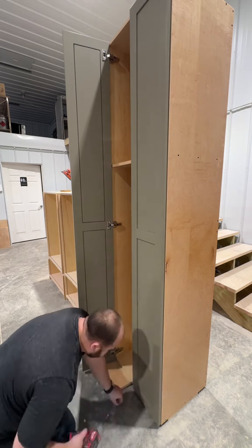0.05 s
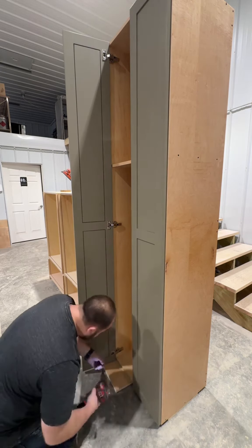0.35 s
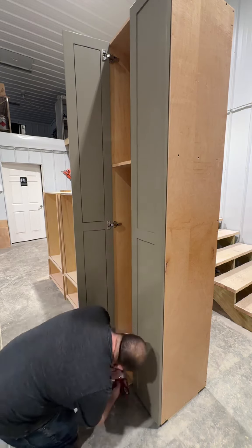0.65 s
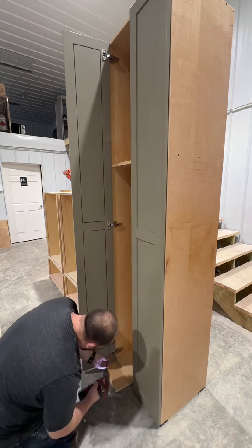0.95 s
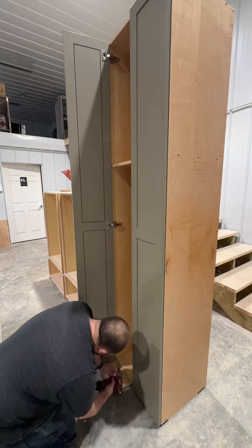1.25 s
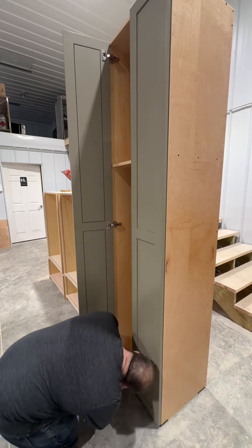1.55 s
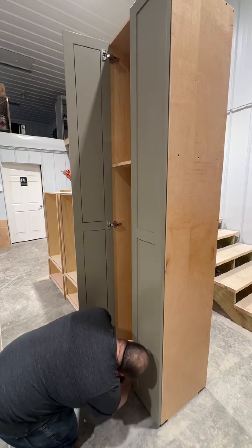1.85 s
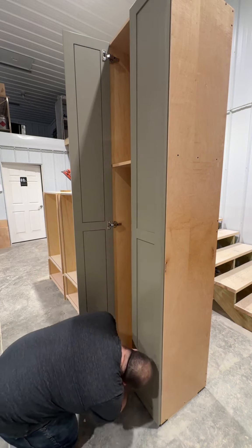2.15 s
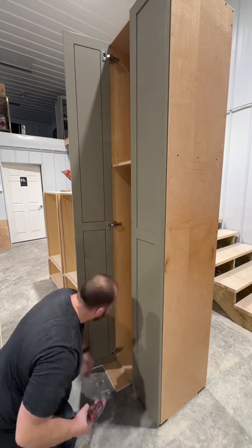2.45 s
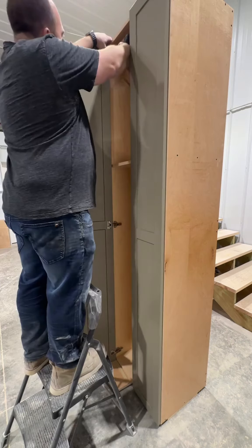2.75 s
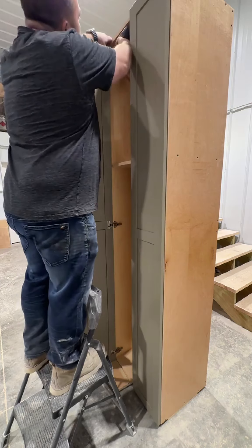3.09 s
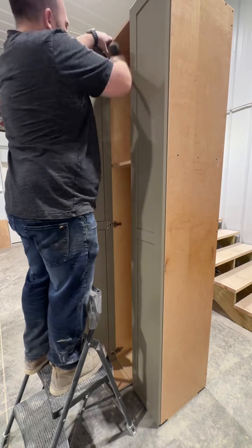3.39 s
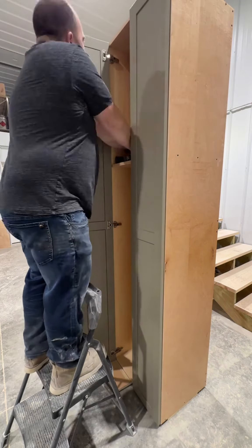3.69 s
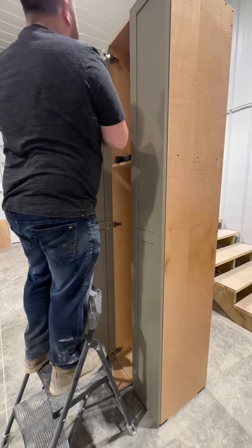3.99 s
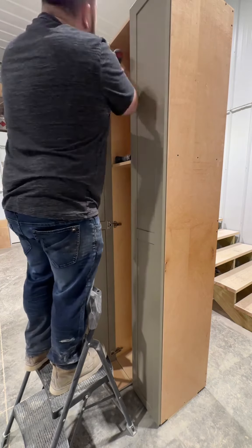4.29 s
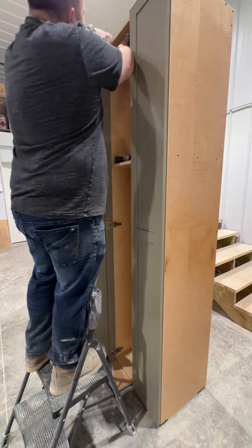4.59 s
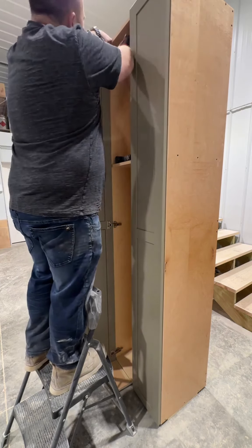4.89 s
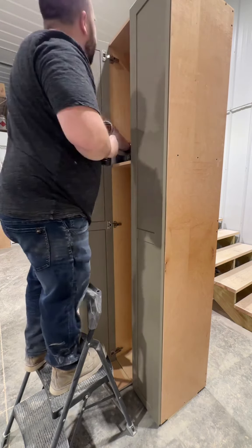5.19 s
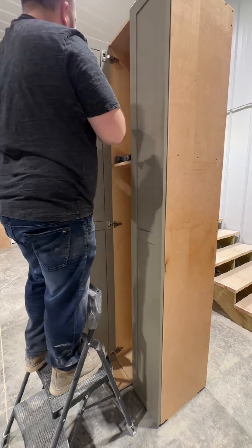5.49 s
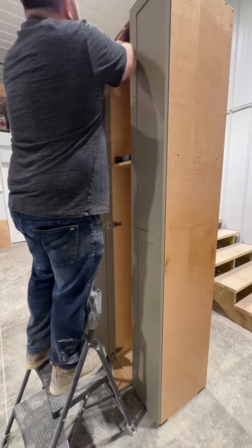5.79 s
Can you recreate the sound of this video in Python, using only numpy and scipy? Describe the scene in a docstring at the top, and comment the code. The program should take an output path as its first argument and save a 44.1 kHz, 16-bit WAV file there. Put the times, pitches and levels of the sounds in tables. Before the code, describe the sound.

Loud knocks and rattles on a wooden cabinet, with two short bursts of a cordless driver, in a quiet workshop.

```python
"""Fitting a cabinet door

In a quiet workshop, the door and body of a tall wooden cabinet knock and rattle as blows make the
panels ring. A cordless driver turns two hinge screws with hissing gears and is set down on a shelf.
Small steel parts tick, and a hinge sticks and slips in a squeak.
The room answers briefly over a faint ventilation hum."""
import sys
import numpy as np
from scipy import signal
from scipy.fft import rfft, irfft
from scipy.io import wavfile
from scipy.ndimage import uniform_filter1d

SR = 44100
rng = np.random.default_rng(int(sys.argv[2]) if len(sys.argv) > 2 else 0)


def bounce(signal):
    """Save signal as a 16-bit WAV file at the path given by the first command-line argument."""
    frames = np.transpose(np.atleast_2d(signal))
    limited = np.clip(frames, -1, 1)
    pcm = np.round(limited * 32767).astype(np.int16)
    wavfile.write(sys.argv[1], SR, pcm)


N = 261846
TIME = np.arange(N) / SR
HIT_SIZE = 16384  # samples in one knock or click
HIT_TIME = (np.arange(HIT_SIZE) - HIT_SIZE // 4) / SR  # the hit peaks at zero

# tone of the moving air: (frequency [Hz], relative level [dB])
AIR_TONE = [(15, -49.5), (25, -13), (118, -6), (176, -15.5), (243, 1), (278, -26), (354, -1), (394, -14.5),
            (462, -8), (558, -9.5), (790, -14.5), (856, -20), (978, -13), (1500, -31), (15000, -53)]
# notes at which the ducts, cabinet and shelf ring: (pitch [Hz], width [Hz], relative level [dB])
DUCT_MODES = [(75, 11, -8), (133.8, 13, 3), (249, 21, -3), (340, 42, -2), (435, 56, 2.5), (597.7, 16, -9)]
CABINET_MODES = [(94, 42, -10.5), (142.6, 22, 2), (211, 24, 2), (288.4, 20, 1.5), (364.4, 55, -8.5),
                 (432.7, 82, -7), (473, 13, -7), (603.7, 17, -4.5), (747, 23, -10.5), (899, 55, -3),
                 (970, 25, -14), (1202, 18, -12), (1393, 32, -34.5), (1565, 50, -22), (2090, 67, -21.5),
                 (2254, 13, -8.5), (2544, 260, -11), (2930, 81, -13.5), (3130, 24, -17), (3400, 62, -33.5)]
SHELF_MODES = [(124.7, 15, -14), (207, 23, -14), (289.3, 14, -4.5), (414, 45, -9.5), (470, 27.4, -0.5),
               (574, 56, -7.5), (683, 45, -3.5), (842, 14, -3.5), (1240, 89, -9), (1450, 64, -11),
               (1650, 37, -25), (2350, 86, -22), (2760, 110, -23)]
# the room's echo: (frequency [Hz], relative level [dB], fade time [s])
ROOM_BANDS = [(80, -16.5, 0.032), (180, -15, 0.082), (400, -8, 0.09), (900, -8.5, 0.095), (2360, -8, 0.093),
              (4740, -13.5, 0.063), (10030, -17.5, 0.013)]
# stereo width: (frequency [Hz], gain of the side signal [dB])
STEREO_WIDTH = [(40, -21), (130, -21), (330, -9), (700, -4.5), (1300, -3.5), (4000, -3.5), (12000, -3)]
# the hinge squeak: (start [s], end [s], pitch [Hz], level [dB])
SQUEAK = (1.828, 1.92, 1885, -67.5)
# screws and hinge parts touching: (time [s], strength [dB])
CLICKS = [(0.403, -88), (0.648, -81.5), (0.864, -85), (0.92, -80.5), (1.05, -87.5), (1.36, -90.5),
          (1.527, -91), (1.717, -78), (1.775, -84), (2.542, -73), (2.568, -69), (3.771, -80.5),
          (3.849, -77.5), (3.94, -83), (4.096, -76), (4.13, -74.5), (4.358, -82.5), (5.247, -68.5),
          (5.285, -72), (5.326, -70), (5.348, -73)]
# tone of the gears and of the shaken panel: (frequency [Hz], relative level [dB])
GEAR_TONE = [(500, -3.5), (900, 3.5), (1600, -5), (2400, 0), (2750, -2.5), (3080, 0.5), (3600, -6.5),
             (4500, -4), (5750, -1), (6050, 5), (6800, 0.5), (8000, -2), (10000, -6.5), (15500, -9)]
RUMBLE_TONE = [(30, -15), (60, -11.5), (85, -0.5), (135, -6.5), (400, -7), (550, -12), (800, -14),
               (1300, -51.5), (4000, -51)]
# pulls of the driver's trigger: (start [s], release [s], motor gain [dB], rumble gain [dB])
DRIVER_RUNS = [(2.774, 2.985, -44, -39.5), (3.26, 3.461, -42.5, -39.5)]
# blows on the cabinet: (time [s], strength [dB], extra bass [dB], dullness [dB], chatter time [s])
CABINET_KNOCKS = [(0.003, -28, -8.5, -6, 0.0082), (0.017, -25, -4.5, -3, 0.024),
                  (0.116, -38.5, -15.5, 22, 0.0092), (1.72, -59, 1, 17, .025), (1.84, -55, -3, -0.5, 0.028),
                  (1.885, -55, 0, 2, 0.038), (1.936, -31.5, 9.5, 3, 0.019), (1.951, -30.5, -17, 1, 0.0063),
                  (1.967, -36.5, 14, -0.5, 0.015), (1.992, -28, -15, 22, 0.0025),
                  (2.046, -33.5, 8.5, 7.5, 0.017), (2.072, -32.5, 10, 7.5, 0.008),
                  (2.118, -27.5, 0.5, -4, 0.017), (2.139, -22.5, -1, 4.5, 0.017),
                  (2.162, -30.5, 3.5, -4.5, 0.017), (2.249, -20, -1.5, 5, 0.022),
                  (2.342, -29, -2.5, -5, 0.01), (2.353, -24, -4, 0.5, 0.022), (2.597, -51.5, 2, 15, 0.012),
                  (2.627, -50.5, 10.5, 15.5, 0.013), (2.667, -56, 5, 17, .005),
                  (2.757, -54, 8.5, 19, 0.032), (3.072, -68.5, 13, 12, 0.022), (3.172, -48, 3.5, -1, 0.015),
                  (3.212, -45.5, -14, -1, 0.022), (3.263, -55.5, 15, 4.5, .008),
                  (4.465, -63, 9.5, 4, 0.012), (4.526, -39, -11, 20.5, 0.012),
                  (4.562, -47.5, -5.5, 21.5, 0.028), (4.617, -61, 9, 19.5, .007),
                  (4.787, -53.5, 6.5, 23, 0.022), (4.881, -50, 8, -3, 0.019), (4.916, -33, 0.5, 4.5, 0.028),
                  (5.001, -28, 0.5, -6, 0.013), (5.014, -26, -3, -6.5, 0.014), (5.025, -28, -8, 3, 0.013),
                  (5.9, -52, -0.5, 4.5, 0.013)]
# the driver and fittings set down and shifted on the shelf: same columns
SHELF_KNOCKS = [(3.636, -45.5, -2, -6, 0.016), (3.687, -29.5, -21, 13, 0.017),
                (3.705, -35.5, -3, 48, 0.0051), (3.803, -49, -1, 23, 0.0075), (3.878, -59, 7, 10, 0.025),
                (3.908, -51, 5.5, 40, 0.033), (3.937, -55.5, 6.5, -8, 0.014),
                (5.248, -37.5, -3.5, 46.5, .01), (5.349, -38.5, -3.5, 48.5, 0.0092)]
# borders of five bands called thump, body, clack, rattle and tick: (frequency [Hz])
BAND_EDGES_HZ = [60, 250, 700, 2000, 5000, 15000]
# tone of a firm blow, one value a band: (relative level [dB])
CABINET_BLOW_DB = [-0.5, -0.5, -9.5, -13.5, -19]
SHELF_BLOW_DB = [-1.5, -2, -10.5, -13, -27.5]
# tone of a click in the top two bands: (relative level [dB])
CLICK_BANDS_DB = [-1, -2.5]
# a soft contact loses its treble first, one value a band: (share of the dullness [0 to 1])
DULL_SHARE = [0, 0, 0.18, 0.68, 1]


def undb(db):
    """Turn decibels into a gain."""
    return 10 ** (np.asarray(db) / 20)


def unit(x):
    """Scale a signal to an average power of 1."""
    return x / np.sqrt(np.mean(x ** 2) + 1e-24)


def freqs(x):
    """List the frequencies in the spectrum of x."""
    return np.maximum(np.fft.rfftfreq(x.shape[-1], 1 / SR), 1e-3)


def colour(x, points):
    """Shape the tone along a curve of (frequency [Hz], gain [dB]) points."""
    hz, db = np.transpose(points)
    gain = undb(np.interp(np.log(freqs(x)), np.log(hz), db))
    return irfft(rfft(x) * gain, x.shape[-1])


def ring(x, modes):
    """Make an object ring; where it is touched decides which way and how far each note swings."""
    f = freqs(x)
    swings = rng.choice([-1, 1], len(modes)) * undb(0.86 * rng.standard_normal(len(modes)))
    response = sum(swing * undb(db) / (1 + 1j * (f * f - hz * hz) / (f * width))
                   for swing, (hz, width, db) in zip(swings, modes))
    return irfft(rfft(x) * response, x.shape[-1])


def wander(rate_hz):
    """Drift smoothly at random, by about 1 either way."""
    size = int(SR / rate_hz)
    steps = np.repeat(rng.standard_normal(N // size + 1), size)
    return unit(uniform_filter1d(steps, size)[:N])


def stereo(pair):
    """Turn a middle and a side signal into left and right; the bass stays near the centre."""
    side = colour(pair[1], STEREO_WIDTH)
    return np.array([pair[0] + side, pair[0] - side])


def add_hit(out, sound, time_s):
    """Mix in a hit so that it lands at the given time."""
    start = int(time_s * SR) - HIT_SIZE // 4
    lo, hi = max(start, 0), min(start + HIT_SIZE, N)
    out[:, lo:hi] += sound[:, lo - start:hi - start]


def contact_force(swell_s, chatter_s, spread_db=3.5):
    """Each hit swells briefly, peaks with a snap and chatters away."""
    gap = np.abs(HIT_TIME)
    swell = 0.78 * np.exp(-gap / max(swell_s, 1e-3))
    chatter = np.exp(-gap / max(chatter_s, 1e-3))
    snap = 0.13 * np.exp(-gap / 0.003)
    force = np.where(HIT_TIME < 0, swell, chatter + snap) * rng.standard_normal((2, HIT_SIZE))
    force *= undb(spread_db * rng.standard_normal((2, HIT_SIZE)))
    return force / np.sqrt(np.sum(force ** 2, axis=1, keepdims=True))


def set_bands(pair, band_db, edges_hz):
    """Give a hit its strength in each band: the place and hardness of the contact set its tone."""
    f, edges = freqs(pair), np.array(edges_hz, float)
    centres = np.sqrt(edges[:-1] * edges[1:])
    masks = 1 / np.sqrt((1 + (edges[:-1, None] / f) ** 16) * (1 + (f / edges[1:, None]) ** 16))
    for _ in range(2):  # twice, because the bands overlap
        bands = irfft(rfft(pair)[:, None] * masks)
        peaks_db = 10 * np.log10(uniform_filter1d(bands ** 2, size=530).max(axis=-1) + 1e-20)
        pair = np.array([colour(x, np.c_[centres, band_db - db]) for x, db in zip(pair, peaks_db)])
    return pair


def ventilation(gain_db, duct_db, side_db):
    """Air moves softly and the ducts add a low hum."""
    air = unit(colour(rng.standard_normal((2, N)), AIR_TONE)) * undb(0.81 * wander(2.1))
    ducts = unit(ring(rng.standard_normal((2, N)), DUCT_MODES))
    hum = colour(ducts, [(600, 0.5), (1500, -25.5)])
    return stereo(undb(gain_db) * (air + undb(duct_db) * hum) * undb([[0], [side_db]]))


def room_echo(dry):
    """A short echo builds up, then fades ever faster."""
    t = np.arange(HIT_SIZE) / SR
    noise = rng.standard_normal((2, HIT_SIZE))
    log_f, log_centres = np.log(freqs(noise)), np.log([row[0] for row in ROOM_BANDS])
    build_up = 1 - np.exp(-(t / 0.0069) ** 2)
    response = 0
    for share, (_, db, fade_s) in zip(np.eye(len(ROOM_BANDS)), ROOM_BANDS):
        band = irfft(rfft(noise) * np.interp(log_f, log_centres, share))
        envelope = build_up * np.exp(-(t / fade_s) ** 1.91)
        response += undb(db) * band * envelope / np.sqrt(np.sum(envelope ** 2))
    echo = signal.fftconvolve(dry.mean(axis=0)[None], response, axes=1)[:, :N]
    return stereo(echo * undb([[0], [1.2]]))


def steel_clicks():
    """Small steel parts touch, each with its own brief ring."""
    out = np.zeros((2, N))
    modes = np.array([(2500, 350, 0), (2950, 570, -7), (4400, 99, -42), (6160, 350, 1)])
    for time_s, db in CLICKS:
        force = contact_force(swell_s=0.015, chatter_s=0.015)
        ringing = ring(force, modes * [rng.uniform(1.0, 1.03), 1, 1])  # each part has its own pitch
        tick = undb(12) * colour(force, [(300, -24), (2000, 14.5), (7000, -4), (15000, -21)])
        click = set_bands(ringing + tick, db + np.array(CLICK_BANDS_DB), BAND_EDGES_HZ[-3:])
        add_hit(out, stereo(click), time_s)
    return out


def hinge_squeak(start, end, pitch_hz, db):
    """Metal sticks and slips in a rough, wavering tone."""
    phase = 2 * np.pi * np.cumsum(pitch_hz * (1 + 0.015 * wander(500))) / SR
    tone = 1.2 * np.sin(phase) + np.sin(2 * phase) + 0.7 * np.sin(3 * phase)
    fade = np.clip(np.minimum(TIME - start, end - TIME) / 0.008, 0, 1)
    return undb(db) * fade * unit(tone)


def cordless_driver(spin_up_s, run_down_s, grit_db, whine_hz):
    """The gears hiss, the turning screw rasps and shakes the panel, and the motor controller whines."""
    grit = undb(grit_db * wander(260))
    gears = unit(colour(rng.standard_normal((2, N)) * grit, GEAR_TONE))
    # the bit catches in the screw head in short bursts
    catches = rng.standard_normal((2, N)) * undb(5 * wander(130))
    rasp = unit(ring(catches, [(3020, 220, -6), (6110, 200, -18.5), (6980, 130, 4.5)]))
    shake = colour(rng.standard_normal((2, N)) * grit, RUMBLE_TONE)
    rumble = unit(unit(shake) + 0.5 * unit(ring(shake, CABINET_MODES)))
    phase = 2 * np.pi * np.cumsum(whine_hz + 2 * wander(30)) / SR
    whine = unit(np.sin(phase)) * undb([[-20], [-26]])  # middle, side
    motor = gears + undb(-11.5) * rasp + whine
    out = np.zeros((2, N))
    for start, release, motor_db, rumble_db in DRIVER_RUNS:
        spin_up = 1 - np.exp(-(np.maximum(TIME - start, 0) / spin_up_s) ** 3.1)
        run_down = np.exp(-np.maximum(TIME - release, 0) / run_down_s)
        # the thread bites hardest halfway through the run
        load = 0.37 + 0.55 * np.sin(np.pi * np.clip((TIME - start) / (release - start), 0, 1))
        out += spin_up * run_down * (undb(motor_db) * motor + undb(rumble_db) * load * rumble)
    return stereo(out)


def cabinet_boom(time_s, gain_db, pitch_hz, fade_s):
    """The hardest shove rocks the whole cabinet: a few deep swings that swell and die."""
    age = np.maximum(TIME - time_s, 0)
    swell = 2 * age / fade_s * np.exp(-(age / fade_s) ** 2)
    return undb(gain_db) * swell * np.sin(2 * np.pi * pitch_hz * age)


def wood_knocks(table, modes, blow_db, crack_db, push_gain):
    """Each blow makes the wooden panels ring, and loose fittings add a sharp crack."""
    firm_db = -30  # strength of a firm blow
    push = np.exp(-(HIT_TIME / 0.00049) ** 2)  # a soft push reaches only the low notes
    out = np.zeros((2, N))
    for time_s, strength_db, bass_db, dull_db, chatter_s in table:
        force = contact_force(swell_s=0.58 * chatter_s, chatter_s=chatter_s)
        crack = colour(force, [(25, -28), (60, -7.5), (300, 6), (1000, 0.5), (3000, -4),
                               (7000, -10), (11000, -20), (15000, -25)])
        force[0] += push_gain * push / push.sum()
        # a hand on the wood shortens the ring, here most for the weak blows
        damping = 1.5 * np.exp(-0.06 * (strength_db - firm_db))
        knock = ring(force, np.array(modes) * [1, damping, 1]) + undb(crack_db) * crack
        band_db = strength_db + np.array(blow_db) - dull_db * np.array(DULL_SHARE)
        band_db[0] += bass_db  # weight behind the blow adds thump
        add_hit(out, stereo(set_bands(knock, band_db, BAND_EDGES_HZ)), time_s)
    return out


def scene():
    """Mix all the work at the cabinet with its echo and the ventilation."""
    work = wood_knocks(CABINET_KNOCKS, CABINET_MODES, CABINET_BLOW_DB, crack_db=-14, push_gain=1.2)
    work += wood_knocks(SHELF_KNOCKS, SHELF_MODES, SHELF_BLOW_DB, crack_db=-17.5, push_gain=0.63)
    work += steel_clicks()
    work += cabinet_boom(time_s=4.994, gain_db=-27, pitch_hz=62, fade_s=0.014)
    work += cordless_driver(spin_up_s=0.054, run_down_s=0.013, grit_db=0.8, whine_hz=12575)
    work += hinge_squeak(*SQUEAK)
    work += room_echo(work)
    # the open door throws the lower tones a little to the left
    lean_hz = [40, 90, 300, 1000, 2000, 5000]
    lean_db = np.array([0.1, 0.4, 0.8, -0.1, -0.4, 0.2])
    left = colour(work[0], np.c_[lean_hz, lean_db])
    right = colour(work[1], np.c_[lean_hz, -lean_db])
    return np.array([left, right]) + ventilation(gain_db=-67.5, duct_db=-7, side_db=3)


def record(dry):
    """Thin the deepest bass and cut the highest treble."""
    bass_cut = signal.butter(2, 38, "high", fs=SR, output="sos")
    treble_cut = signal.ellip(10, 0.2, 80, 15800, fs=SR, output="sos")
    return signal.sosfilt(treble_cut, signal.sosfilt(bass_cut, dry))


dry = scene()
out = record(dry)
bounce(out)
```